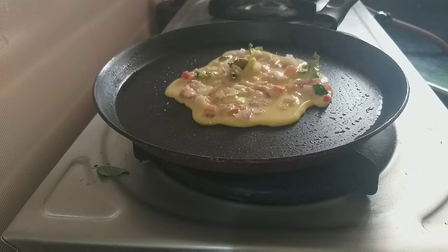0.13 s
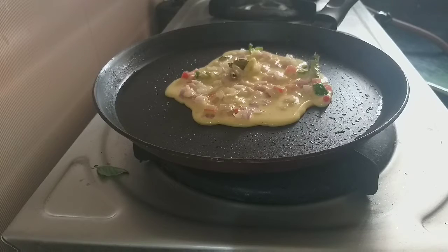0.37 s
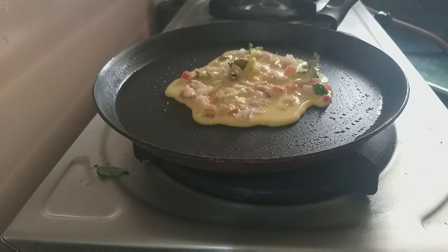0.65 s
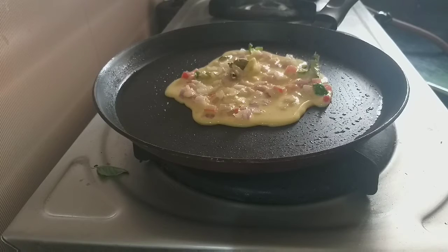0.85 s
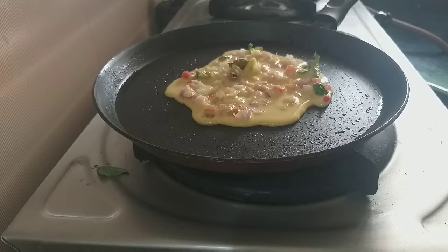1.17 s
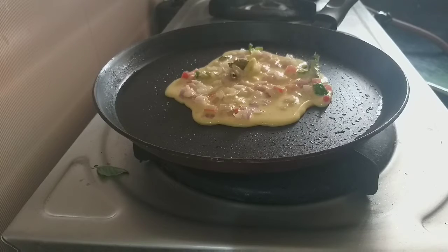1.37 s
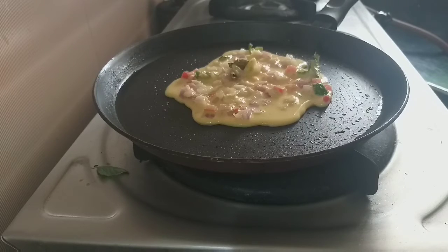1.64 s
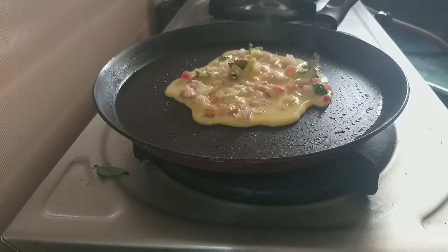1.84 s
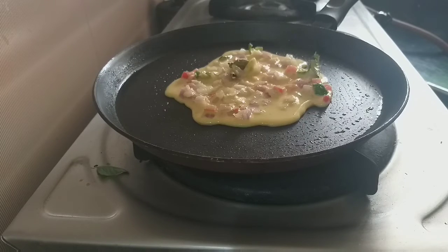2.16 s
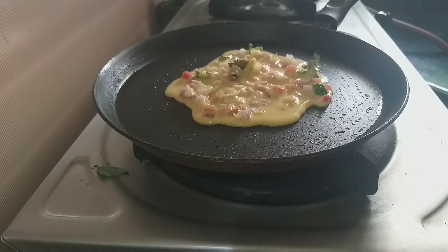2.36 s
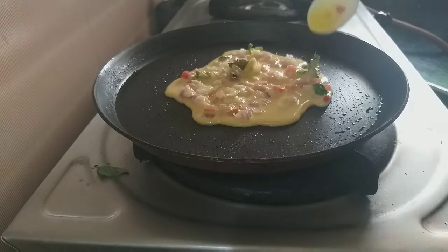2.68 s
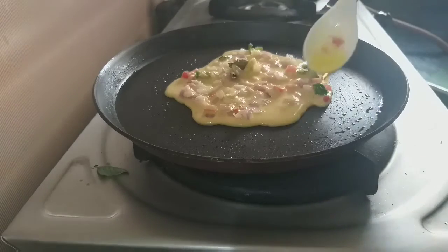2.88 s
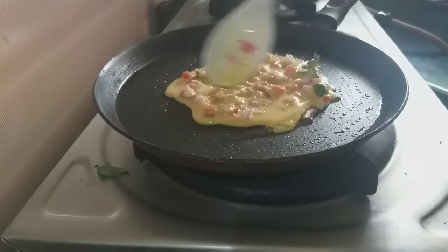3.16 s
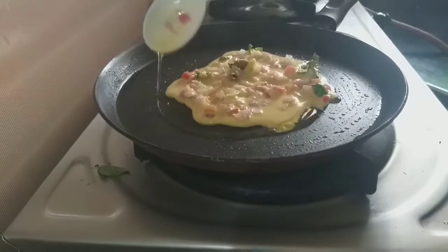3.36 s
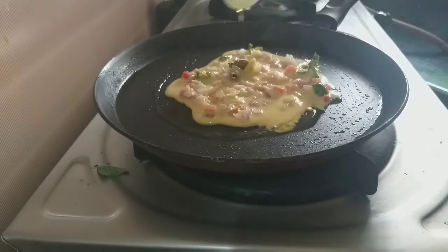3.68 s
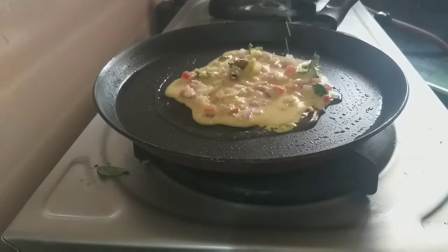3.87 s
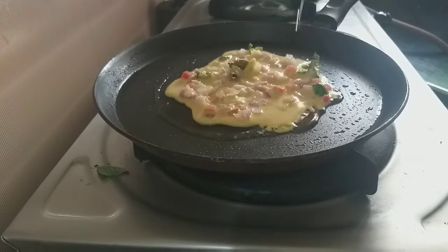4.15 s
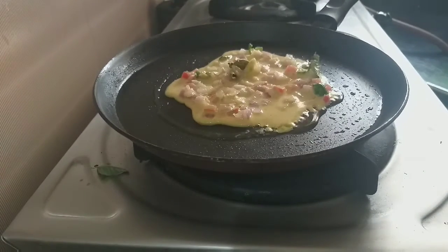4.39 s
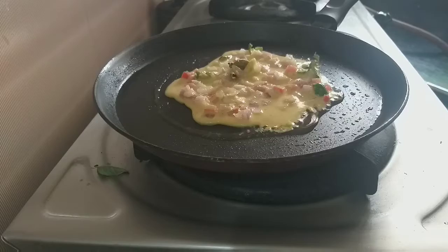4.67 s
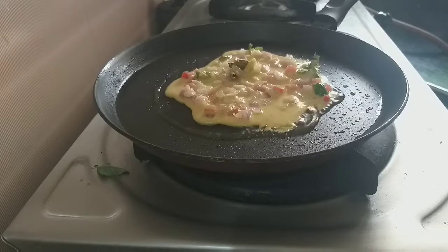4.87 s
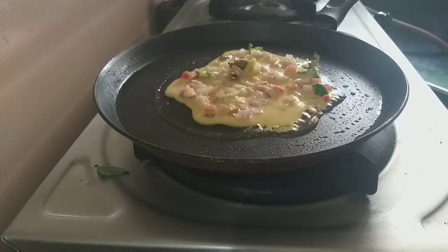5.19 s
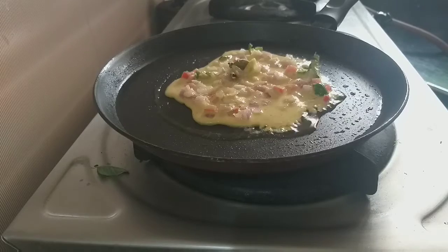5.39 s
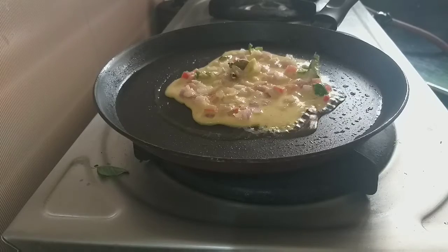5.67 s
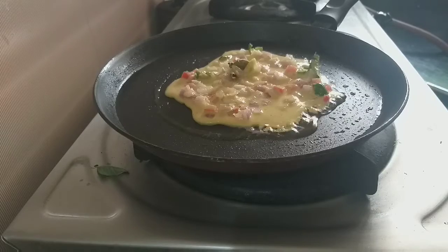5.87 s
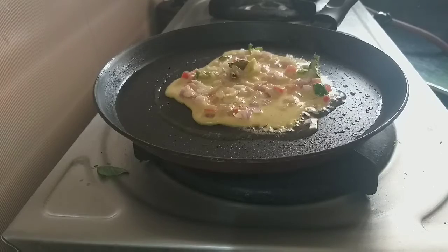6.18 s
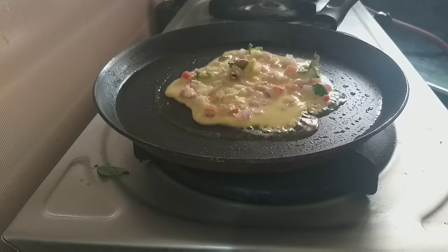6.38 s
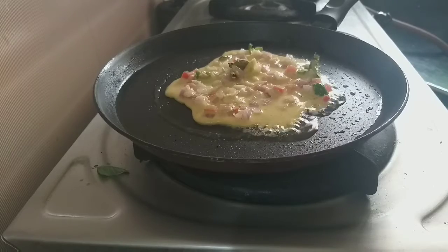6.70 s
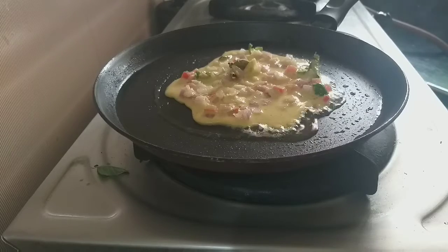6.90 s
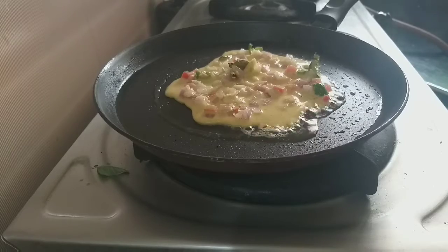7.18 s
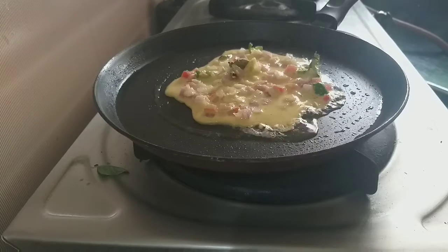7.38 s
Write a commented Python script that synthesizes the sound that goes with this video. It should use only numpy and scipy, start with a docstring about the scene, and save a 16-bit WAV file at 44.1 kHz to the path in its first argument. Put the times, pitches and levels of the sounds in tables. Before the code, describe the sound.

In a small, hard-walled kitchen, batter fries very quietly over a faint gas flame. Thin bangles jingle and a steel ladle knocks sharply, brushing bowl, lid and cup. Around three seconds drizzled oil flares into a bright hiss, then boils and crackles with sharp spits amid more clinks and cup taps. The sound fades to silence, and a spatula softly meets the pan at the end. Close, nearly centred pickup.

```python
"""Batter frying softly on a flat pan over a gas burner comes first: dense random pops, filtered into a sizzle.
Then bright clinks, likely bangles on the cook's wrist, and a steel ladle knocking on pan, lid, bowl and oil cup:
ringing modes with bursts of noise. It slides over steel too, and drizzled oil makes the sizzle flare, boil and
crackle on. The sound fades to silence; at full level again, a spatula meets the pan. A small kitchen echoes."""
import sys
import numpy as np
from scipy import signal
from scipy.fft import rfft, irfft, next_fast_len
from scipy.io import wavfile
from scipy.ndimage import uniform_filter1d, map_coordinates

SR = 44100
rng = np.random.default_rng(int(sys.argv[2]) if len(sys.argv) > 2 else 0)


def output_pcm(signal):
    """Save a mono or channel-first signal as 16-bit PCM at the path in sys.argv[1].

    Samples are clipped to [-1, 1] before scaling.
    """
    pcm = np.clip(np.atleast_2d(signal).T, -1, 1) * 32767
    wavfile.write(sys.argv[1], SR, np.round(pcm).astype(np.int16))


N = 332514  # length in samples

# Surges of frying, as wet batter and oil reach hot metal:
# start_s, level_db, rise_s, hold_s, fall_db_per_s, top_fizz_db (over the level)
FRYING_SURGES = [(0, -71.5, 0.0034, .02, 61, -2), (0.495, -66, 0.024, 1.52, 13.5, -1),
                 (3.024, -47, 0.17, 0.23, 30, -2.5), (3.07, -52, 0.27, 2.1, 2.5, -4),
                 (3.885, -57, 0.059, .1, 60.5, 2.5), (4.9, -59, .08, 1.4, 3, 4.5),
                 (5.919, -46, 0.063, .015, 110, -3)]


def frying_gains():
    """Gains of the sizzle and of its top fizz: the surges add in power to a quiet, steady bed."""
    bed_db, bed_fizz_db = -76.5, 4.5  # the second is the top fizz over the bed
    body_power = amp(bed_db) ** 2
    top_power = amp(bed_db + bed_fizz_db) ** 2
    for *shape, fizz_db in FRYING_SURGES:
        power = swell(*shape) ** 2
        body_power = body_power + power
        top_power = top_power + power * amp(fizz_db) ** 2
    return np.sqrt(body_power), np.sqrt(top_power)


# Tone colour of frying and spits: pitch_hz, level_db (relative, per Hz)
SIZZLE_COLOUR = [(88, -50.5), (150, -17.5), (239, -16), (502, -15.5), (543, -15.5), (673, -13),
                 (727, -14.5), (1710, -14), (2840, -14.5), (4450, -3), (8150, -3), (10500, -9),
                 (12300, -1.5), (13800, -3.5), (15800, -3.5)]


def sizzle(body_gain, top_gain):
    """Steam bursts through the oil: a dense fizz, sprays of a few milliseconds and single crackles."""
    clumps = amp(.5 * wobble(14) + 1.2 * wobble(110))
    fizz = unit(pops(rate=14000, spread_db=1, cap_db=4)) * (1 + 0.81 * flurries(rate=84, life_s=0.00093))
    crackle = unit(pops(rate=350, spread_db=6, cap_db=16))
    frying = shaped(clumps * (unit(fizz) + amp(-8) * crackle), SIZZLE_COLOUR)
    body, top = split(frying, edge_hz=9700)
    # large and small bubbles also spray on their own, so body and top flutter apart
    body = body * (1 + 0.83 * flurries(rate=45, life_s=0.0041))
    top = unit(top * (1 + 0.65 * flurries(rate=55, life_s=0.0019)))
    # the smallest bubbles snap singly and brightly
    snaps = shaped(pops(rate=45, spread_db=4, cap_db=6), SIZZLE_COLOUR)
    bright_snaps = split(snaps, edge_hz=7000)[1]
    top = top + amp(-7) * unit(bright_snaps)
    return body_gain * unit(body) + top_gain * unit(top)


# Resonances of boiling oil: pitch_hz, width_hz, level_db (relative)
BUBBLE_BANDS = [(1533, 190, -7), (1916, 340, -3), (2520, 360, -14.5), (3700, 1600, -7.5)]
# Resonances of the first hiss: pitch_hz, width_hz, level_db (relative)
HISS_BANDS = [(4540, 280, -5.5), (5455, 150, 2.5), (6310, 53, -2.5), (7400, 360, -21)]
# Fresh oil lands round the batter, hisses at once and then boils: start_s, rise_s, hold_s, fall_db_per_s
OIL_HISS_SWELL = (3.035, .13, .27, 36)
OIL_BOIL_SWELL = (3.07, .17, .25, 21)


def boil():
    """Fresh oil meets wet batter: it hisses in a few narrow bands and boils in small ringing bubbles."""
    hiss_db, boil_db = -46.5, -49  # before the random flutter
    bubbles = resonant(pops(rate=3900, spread_db=9, cap_db=10.5), BUBBLE_BANDS)
    hiss = resonant(pops(rate=850, spread_db=3, cap_db=8.0), HISS_BANDS)
    boil_s, *boil_shape = OIL_BOIL_SWELL
    hiss_s, *hiss_shape = OIL_HISS_SWELL
    boiling = swell(boil_s, boil_db, *boil_shape) * amp(2.0 * wobble(45)) * unit(bubbles)
    hissing = swell(hiss_s, hiss_db, *hiss_shape) * amp(2.7 * wobble(30)) * unit(hiss)
    return boiling + hissing


# The loudest spits of oil: start_s, level_db (spits() takes 6 dB off)
LOUD_SPITS = [(0.5833, -37.5), (0.6766, -40.5), (0.8302, -38), (3.2771, -25.5), (3.3626, -28), (3.398, -27),
              (3.4712, -28), (3.682, -20.5), (3.9157, -28.5), (3.9492, -24.5), (4.0397, -25),
              (4.447, -27.5), (5.0539, -23.5), (5.285, -20), (5.4835, -23.5), (5.9963, -26.5),
              (6.0423, -27.5), (6.6644, -27.5), (7.1245, -21.5)]


def spits(frying_gain):
    """Large bubbles burst with a snap and a tiny spray, each coloured differently; lesser ones follow the frying."""
    small_per_s, small_db, small_spread_db = 9, 9.5, 2.5  # small_db is over the frying
    spray_t60_s = 0.015  # time for the spray to fall 60 dB
    out, t = np.zeros(N), np.arange(SR // 20) / SR
    starts = np.flatnonzero(rng.random(N) < small_per_s / SR)
    sizes = frying_gain * amp(small_db + small_spread_db * rng.standard_normal(N))
    loud = [(s, amp(db - 6)) for s, db in LOUD_SPITS]
    small = [(i / SR, sizes[i]) for i in starts]
    for s, gain in loud + small:
        spray = 0.16 * rng.standard_normal(len(t)) * amp(-60 * t / spray_t60_s)
        snap = (t == 0) + spray
        centre_hz = 8000 * np.exp(0.25 * rng.standard_normal())
        snap = resonant(shaped(snap, SIZZLE_COLOUR), [(centre_hz, 1.1 * centre_hz, 0)])
        add(out, s, gain * crest(snap))
    return out


# Bangle clinks: start_s, level_db (bangles() takes 4 dB off), sparkle_db (over the ring),
# knock_db (dull knock over the ringing), t60_s (of the contact noise)
BANGLE_CLINKS = [(0.7958, -36.5, -7.5, -5.5, 0.079), (0.8438, -27, -5, -6, .065),
                 (0.8537, -34.5, -2, -1, .052), (0.9432, -22.5, 0, -11, .08),
                 (0.9631, -17, 4.5, -4.5, 0.041), (1.0501, -29, 0, -6, 0.045),
                 (1.1708, -43.5, -4.5, -2.5, .06), (1.1906, -40.5, 3.5, -3.5, 0.11),
                 (2.171, -42.5, -4, -5, .056), (2.199, -44, -1, -6, .05), (2.2139, -32, -2.5, -9.5, 0.14),
                 (2.6613, -41.5, 7, -10, .083), (2.6746, -31, 1.5, -11, 0.17),
                 (2.6994, -27, -7.5, -9.5, 0.098), (2.8846, -28.5, -10, -8, 0.058),
                 (2.897, -41.5, -17, -5, 0.046), (3.702, -26, -22, -3, 0.0386), (3.9996, -35, 9, -13, .067),
                 (4.0577, -33, 10, -7.5, .056), (4.087, -23, 9, -9, .065), (4.527, -22, -7.5, -8.5, 0.073),
                 (4.54, -23, -4.5, -7.5, 0.094), (4.57, -18.5, 7, -11.5, .065),
                 (4.6368, -33.5, 2, -12, .058), (4.7141, -33.5, -1, -4, 0.041),
                 (4.7428, -27, -13, -11, 0.12), (4.7746, -32, 0, -7, .047),
                 (4.844, -25.5, -3.5, -9.5, 0.12), (4.8978, -30.5, 2.5, -9.5, 0.05),
                 (5.8469, -28, 6, -11, 0.071), (6.1378, -27, 5, -10.5, 0.058),
                 (6.2723, -37.5, -18, -13.5, 0.06)]
# Ringing modes: pitch_hz, width_hz (before the damping factor), level_db (relative, before weighting by width)
BANGLE_MODES = [(4310, 48, -13), (6360, 100, -27), (7130, 130, -8.5), (7710, 28, 0.5), (8030, 98, 0.5),
                (9000, 74, -3.5), (8610, 24, 6.5), (9810, 250, -13.5), (10030, 49, -2), (11670, 77, -0.5),
                (13140, 56, -9), (13600, 120, -28), (12800, 18, -11.5), (14000, 120, 2), (15060, 26, -12.5),
                (16300, 25, -4.5)]
# Their contact noise: pitch_hz, level_db (relative, per Hz)
BANGLE_NOISE = [(59, -42.5), (100, -16), (580, -18), (1410, -17.5), (1940, -19), (2200, -18), (3370, -16),
                (8550, -10.5), (10800, -7.5), (13600, 8), (15800, -1.5)]


def bangles():
    """Thin rings of slightly different sizes clash: a dull knock under a ring and a sparkle whose balance varies."""
    out = np.zeros(N)
    for s, db, sparkle_db, knock_db, t60 in BANGLE_CLINKS:
        detune = np.exp(.02 * rng.standard_normal())
        clash = blow(BANGLE_MODES, BANGLE_NOISE, t60, damping=0.67, noise_db=1.5, detune=detune)
        # a softer start, as the rings meet one after another
        clash = clash * (1 - np.exp(-np.arange(len(clash)) / SR / 0.00055))
        knock, rest = split(clash, edge_hz=6500)
        ring, sparkle = split(rest, edge_hz=9400)
        ringing = crest(crest(ring) + amp(sparkle_db) * crest(sparkle))
        add(out, s, amp(db - 4) * crest(ringing + amp(knock_db) * crest(knock)))
    return out


# Steel modes: pitch_hz, width_hz (before the damping factor), level_db (relative, before weighting by width)
PAN_MODES = [(740, 150, -18), (877, 130, -21), (1700, 22, 1), (2220, 140, -11.5), (2864, 67, -9.5),
             (2660, 150, -7), (3147, 30, -3), (3250, 30, -0.5), (3736, 60, 0.5), (4500, 44, 1),
             (4700, 60, 3), (4854, 61, 3.5), (5060, 27, -0.5), (4940, 30, -1), (5260, 79, -17.5),
             (6470, 60, 3.5), (6640, 50, 1.5), (7200, 31, 1), (7990, 30, -10.5), (8700, 49, -3.5),
             (10600, 71, -18), (13400, 55, -11.5)]
LADLE_MODES = [(1780, 8.4, -7.5), (2710, 89, -2.5), (3270, 10, 2), (4320, 74, -4.5), (4900, 78, -8),
               (5330, 38, -7.5), (6340, 85, -0.5), (8070, 82, -8), (9300, 80, -12), (12040, 150, -11.5),
               (14700, 120, -12.5)]
LID_MODES = [(2023, 100, 3), (2110, 81, -5), (2890, 70, -10), (3090, 120, -2), (3420, 53, -6),
             (3620, 100, -6), (4020, 55, -3), (5200, 50, -13), (5550, 56, -13), (8200, 66, -11)]
BOWL_MODES = [(1600, 46, -4.5), (2665, 24, 5), (2994, 45, -6), (3330, 40, -4.5), (5080, 25, -4.5)]
GRIDDLE_MODES = [(396, 7.3, 1.5), (446, 96, -18), (290, 50, -21.5), (1445, 120, -20.5), (5430, 30, -36)]
# Contact noise of steel: pitch_hz, level_db (relative, per Hz)
PAN_CONTACT = [(59, -52.5), (100, -23.5), (479, -17.5), (814, -3.5), (1240, -14), (1670, -6.5), (2900, -4),
               (3160, -8), (4160, -6), (4820, -12.5), (5600, -9.5), (7370, -8), (15800, -21)]
LADLE_CONTACT = [(88, -46), (150, -16.5), (1280, -15), (1890, -10), (2170, -20), (3200, -5), (3960, -24.5),
                 (4200, -7.5), (6320, -9), (15800, -15)]
LID_CONTACT = [(120, -49), (200, -36), (817, -7), (1360, -12), (2080, -3), (2360, -3), (4080, -16),
               (4560, -7), (5570, -5), (15800, -36.5)]
# What the bowl and the lid ring with when brushed: pitch_hz, width_hz, level_db (relative)
BOWL_BRUSHED = [(950, 200, -9), (1663, 61, -6.5), (2493, 96, -2), (4680, 93, -7), (7600, 31, 2.5),
                (8030, 40, 4.5), (8800, 110, -9)]
LID_BRUSHED = [(2006, 150, 1.5), (3350, 130, 3), (4160, 38, -18), (4930, 230, -13), (6300, 47, -15)]


def steelware():
    """The ladle knocks and slides about among pan, lid and bowl; at last the spatula lands on the flat griddle."""
    return (struck("pan", PAN_MODES, PAN_CONTACT, damping=1.1, noise_db=-3.5, detune_spread=.015)
            + struck("ladle", LADLE_MODES, LADLE_CONTACT, damping=.8, noise_db=-9.0)
            + struck("lid", LID_MODES, LID_CONTACT, damping=1.0, noise_db=-14.5)
            + struck("bowl", BOWL_MODES, LID_CONTACT, damping=0.33, noise_db=-13)
            + struck("griddle", GRIDDLE_MODES, PAN_CONTACT, damping=0.85, noise_db=-3.5)
            + rubbed("bowl", BOWL_BRUSHED) + rubbed("lid", LID_BRUSHED))


# Modes of the tapped cup: pitch_hz, width_hz (before the damping factor), level_db (relative, before width weighting)
CUP_MODES = [(835, 12, -5), (920, 26, -3), (3160, 17, -3), (5110, 22, -5), (1840, 150, -35),
             (4230, 40, -34)]
# Resonances of the scraped cup: pitch_hz, width_hz, level_db (relative)
CUP_SCRAPE = [(874, 108, 1.5), (1586, 27, -8), (1934, 180, -4.5), (2444, 400, -20), (3440, 210, -11.5),
              (4250, 120, -17), (4840, 160, -18.5), (6430, 120, -18)]


def oil_cup():
    """The ladle slides over the cup and taps it: a sagging scrape and short ringing blows."""
    scrape = rubbed("cup", CUP_SCRAPE, bend=0.019, sag_per_s=.3)
    return scrape + struck("cup", CUP_MODES, LID_CONTACT, damping=0.98, noise_db=-3)


# Blows on steel: start_s, what is struck,
# level_db (scene() plays the direct cup 1.2 dB louder left and 1.2 dB softer right),
# t60_s (of the contact noise), tilt_db_per_octave
STEEL_BLOWS = [(0.785, "bowl", -48, .15, 1.2), (0.797, "bowl", -42.5, 0.52, 0.5),
               (1.358, "pan", -32.5, 0.037, -0.5), (1.361, "pan", -15, 0.02, .5),
               (1.367, "pan", -28.5, 0.1, 0.5), (1.584, "ladle", -27, .063, 0),
               (1.678, "lid", -30.5, 0.036, 2.5), (1.848, "lid", -49, 0.026, -24),
               (1.89, "lid", -51, .05, -6), (2.796, "ladle", -54.5, 0.16, 1.5),
               (2.887, "ladle", -49, 0.043, 8), (4.998, "cup", -34.5, 0.092, 1.5),
               (5.115, "cup", -32.5, 0.094, 2.5), (5.13, "cup", -42.5, 0.36, -2.5),
               (5.16, "cup", -46.5, 0.092, -5), (6.34, "cup", -54, 0.066, -19), (6.37, "cup", -54, .1, -18),
               (7.455, "griddle", -47, 0.24, -3.5), (7.468, "griddle", -49.5, .07, -2.5),
               (7.492, "griddle", -47, .1, -6)]


def struck(thing, modes, spectrum, damping, noise_db, detune_spread=0):
    """All blows on one steel thing; the touching ladle may shift its modes a little from blow to blow."""
    out = np.zeros(N)
    for s, name, db, t60, tilt_db in STEEL_BLOWS:
        if name == thing:
            detune = np.exp(detune_spread * rng.standard_normal())
            add(out, s, amp(db) * blow(modes, spectrum, t60, damping, noise_db, tilt_db, detune))
    return out


# The ladle slides over steel: start_s, what is brushed,
# level_db (scene() plays the direct cup 1.2 dB louder left and 1.2 dB softer right),
# rise_s, hold_s, fall_db_per_s
LADLE_STROKES = [(1.047, "bowl", -51, .12, 0.03, 296), (1.747, "lid", -63, 0.12, 0.054, 303),
                 (1.997, "cup", -49, .06, .045, 193.5)]


def rubbed(thing, modes, bend=0.021, sag_per_s=0):
    """Steel slides on steel in tiny uneven slips; the moving contact bends the resonances and may let them sag."""
    out, t = np.zeros(N), np.arange(N) / SR
    for s, name, db, rise_s, hold_s, fall_db_per_s in LADLE_STROKES:
        if name == thing:
            slips = resonant(pops(rate=850, spread_db=3.5, cap_db=11.5), modes)
            sag = np.clip(sag_per_s * (t - s - rise_s - hold_s / 2), -.06, .06)
            # reading the slips at a changing speed bends their pitch
            position = np.cumsum(1 + bend * wobble(23) - sag)
            bent = map_coordinates(slips, [position], mode="wrap")
            out += swell(s, db, rise_s, hold_s, fall_db_per_s) * unit(bent)
    return out


def blow(modes, spectrum, t60, damping, noise_db, tilt_db=0, detune=1):
    """One contact: modes ring at fresh strengths over a short burst of dense vibration; soft contacts tilt it down."""
    t = np.arange(SR // 3) / SR
    ring = np.zeros(len(t))
    for hz, width_hz, db in modes:
        strength = amp(db + 2 * rng.standard_normal()) * width_hz
        decay = np.exp(-np.pi * width_hz * damping * t)
        ring += strength * decay * np.sin(2 * np.pi * (detune * hz * t + rng.random()))
    burst = shaped(rng.standard_normal(len(t)) * amp(-60 * t / max(t60, .005)), spectrum)
    contact = (crest(ring) + amp(noise_db) * crest(burst)) * (1 - np.exp(-t / 0.00059))
    lowest_hz = min(hz for hz, _, _ in modes)
    return crest(coloured(contact, lambda hz: amp(tilt_db * np.log2(np.maximum(hz / lowest_hz, 1)))))


# Tone colour of the flame: pitch_hz, level_db (relative, per Hz)
FLAME_COLOUR = [(15, -65.5), (25, -18.5), (102, -7.5), (176, -9.5), (237, -17.5), (510, -19.5),
                (867, -23.5), (1010, -21.5), (1070, -27), (2210, -27.5), (4000, -31.5), (5200, -70.5),
                (8800, -120)]
# Mains hum and a faint whine: pitch_hz, level_db
HUM_TONES = [(104, -79), (13955, -86), (10540, -91.5)]
# The low rumble swells for a while: start_s, level_db, rise_s, hold_s, fall_db_per_s
RUMBLE_SWELL = (3, -70, -0.06, 1.7, 8)


def burner():
    """The flame rumbles softly and unevenly, as filtered noise, over steady tones with a slightly wandering phase."""
    t = np.arange(N) / SR
    hum = sum(amp(db) * unit(np.sin(2 * np.pi * hz * t + 0.24 * wobble(6.3))) for hz, db in HUM_TONES)
    flame_gain = np.hypot(amp(-71.5), swell(*RUMBLE_SWELL))
    flame = unit(shaped(rng.standard_normal(N), FLAME_COLOUR))
    return flame_gain * amp(1.4 * wobble(6)) * flame + hum


# How long the kitchen echoes: pitch_hz, t60_s (time to fall 60 dB)
KITCHEN_DECAY = [(200, 0.44), (1500, 0.47), (5000, 0.35), (14000, 0.31)]


def room(x):
    """Hard kitchen walls answer after 5 ms with a short diffuse tail of decaying noise."""
    hz, t, z = signal.stft(rng.standard_normal(SR // 2), SR, nperseg=256)
    decay = amp(-60 * t / along(KITCHEN_DECAY, hz)[:, None])
    tail = signal.istft(z * decay, SR, nperseg=256)[1]
    delayed = np.pad(x, (round(.005 * SR), 0))
    return signal.fftconvolve(delayed, tail / np.linalg.norm(tail))[:N]


def pops(rate, spread_db, cap_db):
    """Bursting bubbles or slips: random impulses, rate a second, of uneven size up to a cap."""
    size_db = np.minimum(spread_db * rng.standard_normal(N), cap_db)
    return (rng.random(N) < rate / SR) * rng.choice([-1, 1], N) * amp(size_db)


def flurries(rate, life_s):
    """Gain of short sprays: a bubble bursts and sets off its neighbours."""
    starts = (rng.random(N) < rate / SR) * rng.exponential(size=N)
    return signal.lfilter([1], [1, -np.exp(-1 / (life_s * SR))], starts)


def swell(s, db, rise_s, hold_s, fall_db_per_s):
    """Gain that rises smoothly from time s, holds and dies away."""
    t = np.arange(N) / SR - s
    rise = np.sin(np.pi / 2 * np.clip(t / max(rise_s, .001), 0, 1)) ** 2
    return rise * amp(db - abs(fall_db_per_s) * np.maximum(t - rise_s - hold_s, 0))


def wobble(rate):
    """A smooth random curve, rate knots a second."""
    return map_coordinates(rng.standard_normal(int(N * rate / SR) + 4), [np.arange(N) * rate / SR])


def coloured(x, gain, size=4096):
    """x through a filter with the given gain over frequency that only acts forward in time."""
    # folding the cepstrum gives the filter minimum phase
    cepstrum = irfft(np.log(np.maximum(gain(np.fft.rfftfreq(size, 1 / SR)), 1e-6)))
    cepstrum[1:size // 2] *= 2
    cepstrum[size // 2 + 1:] = 0
    return signal.fftconvolve(x, irfft(np.exp(rfft(cepstrum))))[:len(x)]


def shaped(x, spectrum):
    """x filtered along (pitch_hz, level_db) points."""
    return coloured(x, lambda hz: amp(along(spectrum, hz)))


def resonant(x, modes):
    """x through steep-sided (pitch_hz, width_hz, level_db) resonances."""
    def gain(hz):
        return sum(amp(db) / (1 + ((hz * hz - c * c) / (hz * w + 1)) ** 2) for c, w, db in modes)
    return coloured(x, gain)


def split(x, edge_hz):
    """The parts of x below and above an edge."""
    filters = [signal.butter(4, edge_hz, kind, fs=SR, output="sos") for kind in ("low", "high")]
    return [signal.sosfilt(sos, x) for sos in filters]


def along(points, hz):
    """Read a value at hz from (pitch_hz, value) points on a log axis."""
    f, v = np.transpose(points)
    return np.interp(np.log(hz + 1), np.log(f + 1), v)


def amp(db):
    """Decibels to a plain gain."""
    return 10 ** (np.asarray(db) / 20)


def unit(x):
    """Scale to an rms (average strength) of 1."""
    return x / np.sqrt(np.mean(x ** 2) + 1e-20)


def crest(x):
    """Scale so that the loudest 2 ms have rms 1."""
    return x / np.sqrt(uniform_filter1d(x ** 2, size=88).max() + 1e-20)


def add(track, s, x):
    """Mix x into the track at time s."""
    start = round(s * SR)
    track[start:start + len(x)] += x[:len(track) - start]


def scene():
    """All sources sit in the middle, echoes too, but the direct oil cup is slightly louder on the left."""
    body_gain, top_gain = frying_gains()
    clinks, steel, cup, flame = bangles(), steelware(), oil_cup(), burner()
    frying = sizzle(body_gain, top_gain) + boil() + spits(body_gain)
    walls = amp(-11.5) * room(frying) + amp(-10) * room(clinks) + amp(-9.0) * room(steel + cup)
    left_right_db = [[1.2], [-1.2]]
    return frying + clinks + steel + flame + walls + cup * amp(left_right_db)


def record(dry):
    """The sound fades straight to silence, then returns at full level; nothing stays above the top pitch."""
    fade_start_s, fade_end_s, return_s = 6.505, 7.385, 7.45
    top_hz = 15800
    t = np.arange(N) / SR
    fade = np.clip((fade_end_s - t) / (fade_end_s - fade_start_s), 0, 1)
    faded = dry * np.where(t < return_s, fade, 1)
    m = next_fast_len(N + SR // 2)
    kept = np.fft.rfftfreq(m, 1 / SR) < top_hz
    return irfft(rfft(faded, m) * kept, m)[:, :N]


dry = scene()
out = record(dry)
output_pcm(out)
```